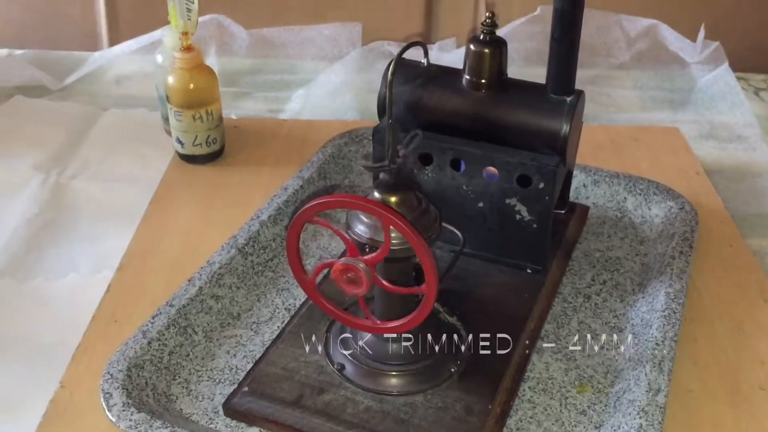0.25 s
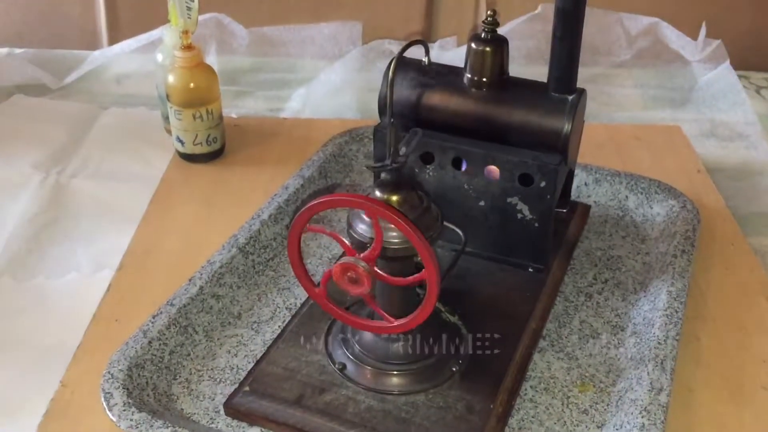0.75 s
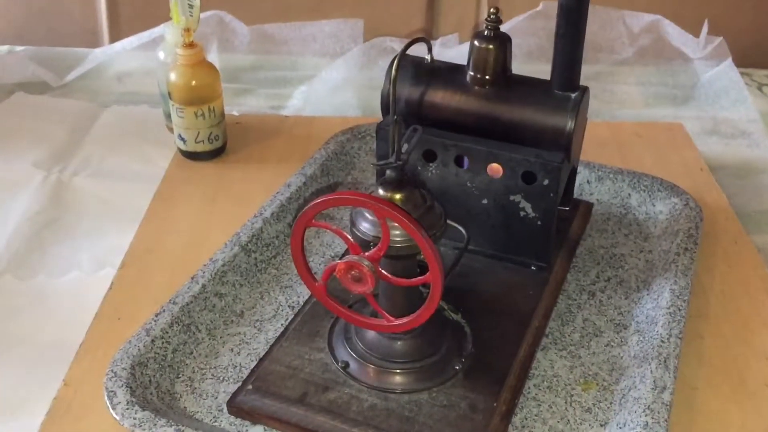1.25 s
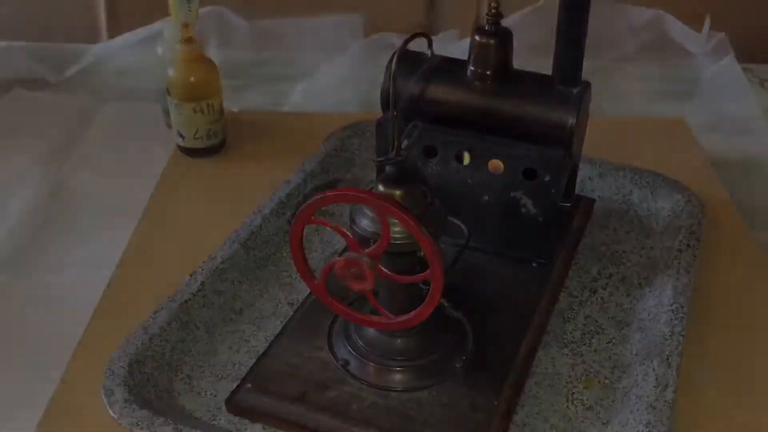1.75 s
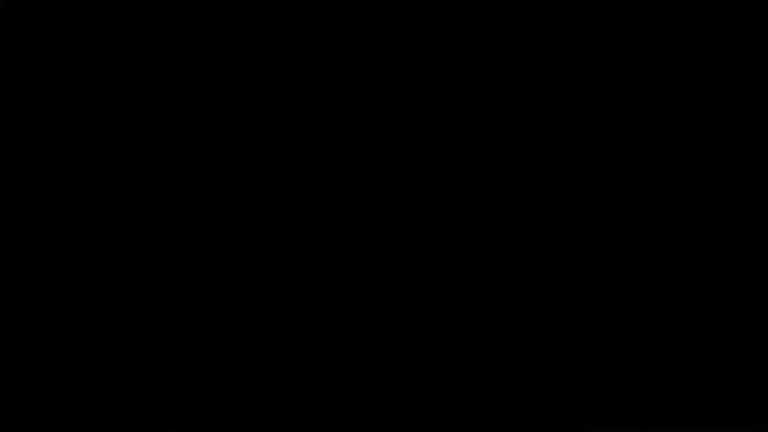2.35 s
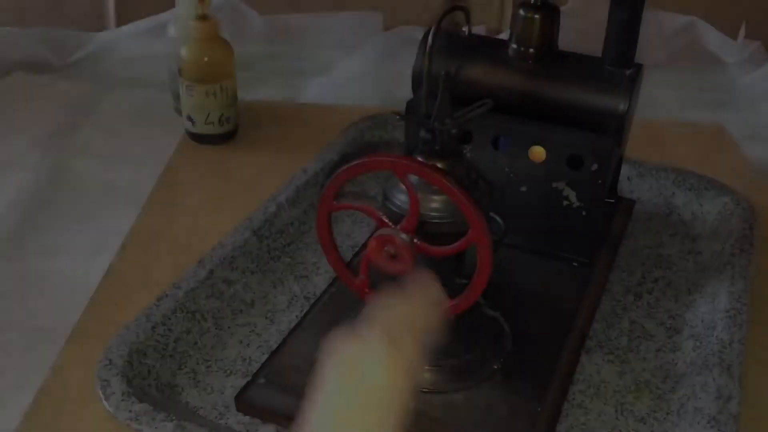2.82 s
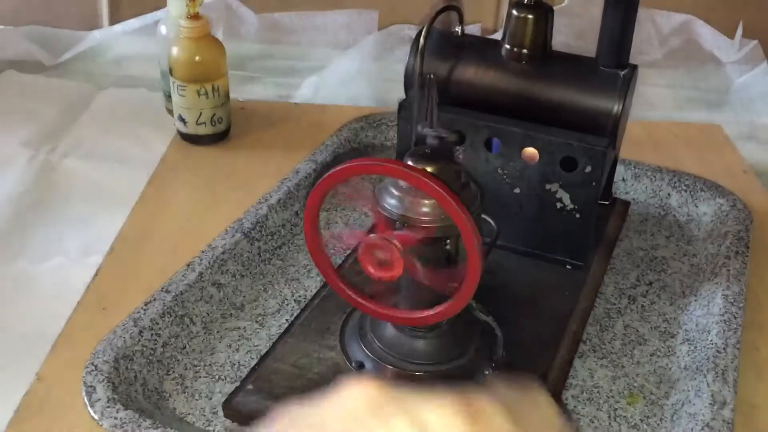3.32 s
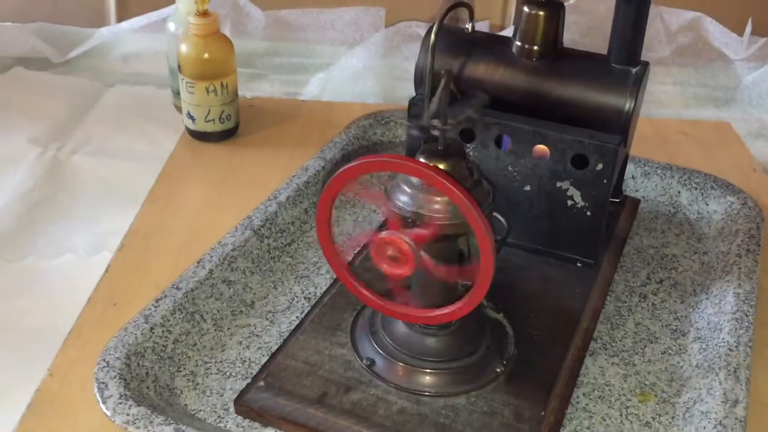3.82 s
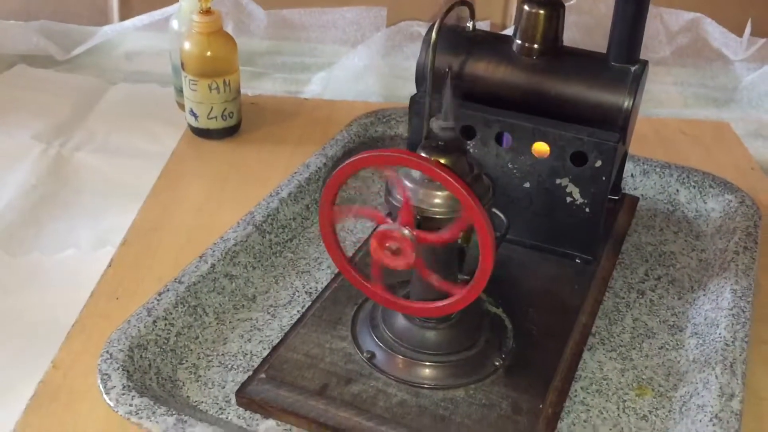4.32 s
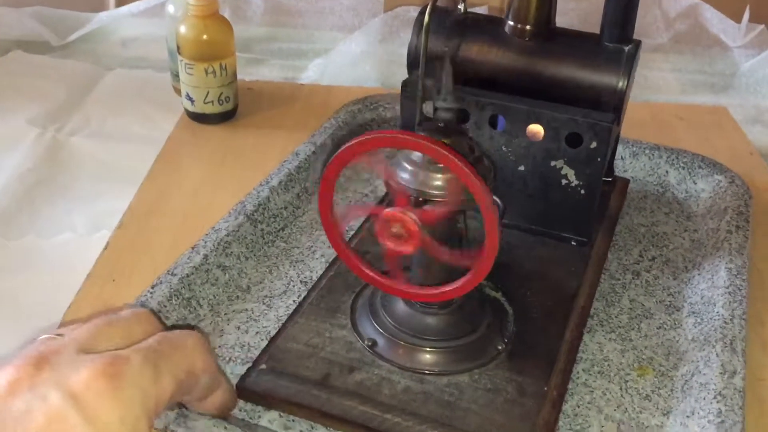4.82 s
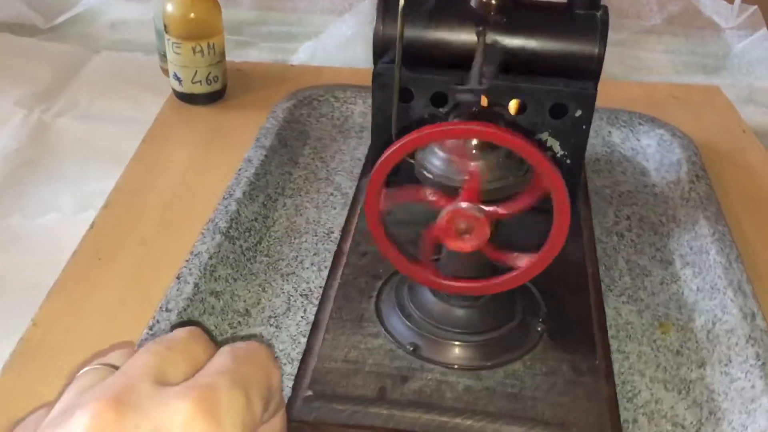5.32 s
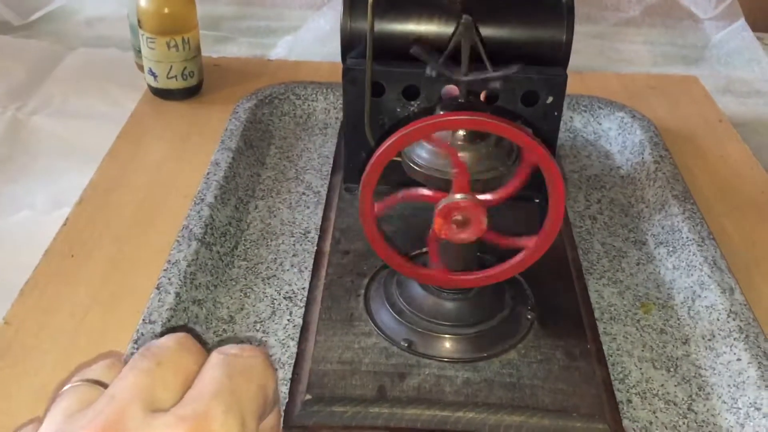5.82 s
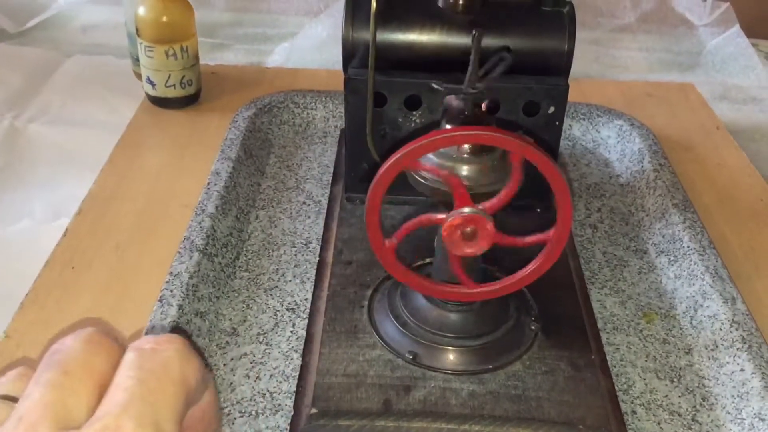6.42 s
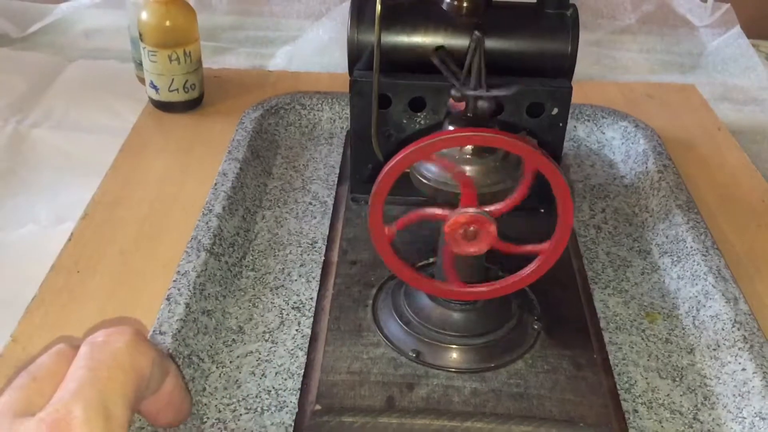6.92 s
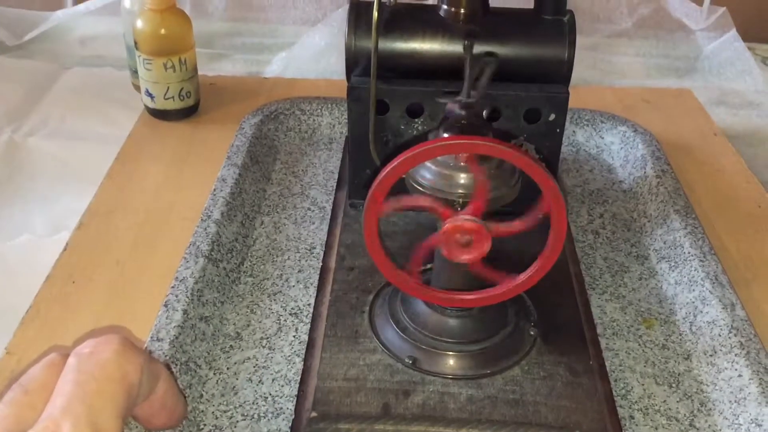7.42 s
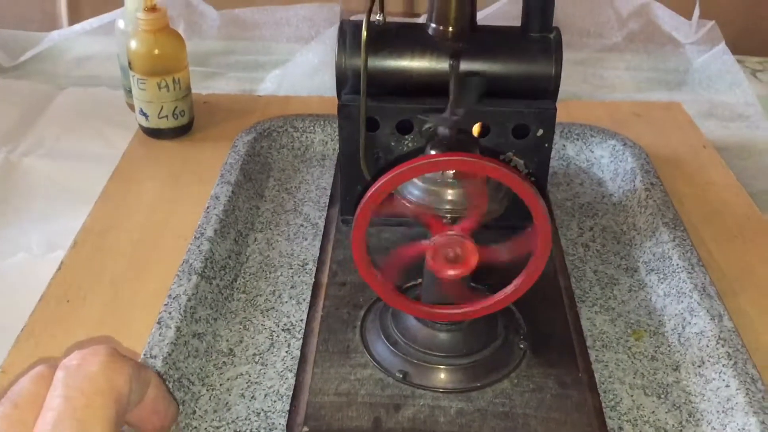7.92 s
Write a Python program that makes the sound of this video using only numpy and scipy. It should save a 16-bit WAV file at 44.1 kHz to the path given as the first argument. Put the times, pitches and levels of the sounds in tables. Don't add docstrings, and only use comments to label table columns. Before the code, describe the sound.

A toy steam engine on a tin tray, heard close in a quiet room with short dull echoes. At 0 s a soft wet exhaust puff gurgles through bright, sputtering steam hiss; a second comes at 0.5 s with a low table thump. The engine stalls: hiss in small swells, fine ticks of droplets, a dry lever click at 1.03 s, light knocks at 1.5 s and a sharper rap at 1.8 s. Around 2.4 s the sound dips for an instant, then steady hiss returns, with a tinny knock at 2.9 s. From 3.4 s gurgling chuffs restart, about three per second, with bubbling tones. At 4.2-4.8 s the dragged base shudders and thumps, with a loud metallic clank at 4.47 s. From 5 s chuffs settle near two per second, hiss spitting between them; a strong wet gush bursts at 6.5 s, and the chuffing continues to the end.

```python
import sys
import numpy as np
from scipy import signal
from scipy.io import wavfile
from scipy.ndimage import uniform_filter1d

SR = 44100
rng = np.random.default_rng(int(sys.argv[2]) if len(sys.argv) > 2 else 0)


def elevation(decibels):
    levels = np.asarray(decibels, float)
    return 10 ** (levels / 20)


def wrap_up_sound(samples):
    columns = np.atleast_2d(samples).T
    tamed = np.clip(columns, -1, 1)
    steps = np.round(tamed * 32767).astype(np.int16)
    wavfile.write(sys.argv[1], SR, steps)


N = 359415
SCENE_CHANGE_S = 2.405

# start in seconds, port open in seconds, gurgle in dB,
# port opening rate in dB/s, table shake in dB.
STROKES = [(0.0, 0.07, -39.5, 184, -66), (0.512, 0.089, -39, 905, -75), (3.42, 0.1, -37, 200, -64),
           (3.67, 0.11, -41, 400, -67), (3.96, .11, -42, 248, -63), (4.27, 0.077, -41.5, 292, -76),
           (4.48, 0.021, -40, 600, -74), (4.6, 0.11, -43, 300, -60), (4.98, 0.096, -41, 158, -69),
           (5.34, 0.056, -39.5, 145, -59), (5.74, 0.125, -41.5, 221, -60.5), (6.21, 0.082, -39, 196, -59.5),
           (6.665, 0.078, -37.5, 404, -60), (7.16, 0.06, -39, 199, -57.5), (7.593, 0.11, -40.5, 227, -58.5),
           (8.02, 0.1, -37, 300, -58.5)]


def steam():
    # centre in Hz, width in Hz, then level in dB at the first stand, second stand, turned to the front.
    metal = [(946, 470, 0.5, 2.5, -7), (1800, 510, 3.5, 1.5, -2.5), (2483, 506, -8, -3.5, -8.5),
             (3200, 667, 4.5, 2, 2.5), (3925, 230, -18, -20.5, -6.5), (4323, 620, 0.5, 1, 1.5),
             (5375, 690, -4.5, -2.5, 3), (6035, 550, 1, 1, -5.5), (6816, 920, -8, -3.5, -1),
             (8905, 1380, -0.5, 1, 4.5), (9870, 1100, -6.5, -11, -1), (11280, 780, 1, 1, 2),
             (11750, 1320, 0, -0.5, 5), (13500, 4300, 0, -1, -0.5), (15300, 1200, -2, 4, 5)]
    turn_s = (4.7, 6)
    leak_db, sputter_db = valve()
    jet_grains = grains(per_s=370.0 * elevation(1.5 * (leak_db + 46.0)), spread_db=9.5)
    jet = rng.standard_normal(N) + 0.51 * band(jet_grains, 6400, 10000, order=1)
    wet = rng.standard_normal(N) + 0.35 * grains(per_s=600.0 * elevation(5.5 * drift(17.0)), spread_db=5.5)
    surge = drift(60.0)
    leak = elevation(leak_db + 1.0 + 1.0 * surge) * band(jet, 9870, 9000, order=1)
    sputter = elevation(sputter_db + 4.0 + 2.24 * surge) * band(wet, 3600, 5260, order=1)
    source = leak + sputter + elevation(7.0) * band(spits(), 3400, 2000) + ticks()
    t = np.arange(N) / SR
    out = np.zeros(N)
    for k, (hz, width_hz, first_db, second_db, front_db) in enumerate(metal):
        stand_db = np.where(t < SCENE_CHANGE_S, first_db, np.interp(t, turn_s, [second_db, front_db]))
        wander_db = (1.67 + 2500 / hz) * drift(7.6) + 0.57 * drift(3.7)
        out += (-1) ** k * elevation(stand_db + wander_db) * band(source, hz, width_hz)
    return out


def valve():
    # time in seconds, leak in dB, sputter relative to the leak in dB.
    pressure = [(0.0, -48, -6.5), (0.8, -49, -10.5), (1.5, -49.5, -10), (2.38, -47.5, -14.5),
                (2.44, -45, -14.5), (2.85, -45, -15), (3.15, -42.5, -40), (3.5, -47.5, -6.5),
                (3.8, -44.5, -5), (4.15, -45, -15), (4.45, -46.5, -7), (4.58, -43, -4), (4.8, -44.5, -11),
                (4.95, -41.5, -2), (5.03, -47.5, -4.5), (5.6, -45.5, -4.5), (7.0, -45, -3.5),
                (8.15, -45.5, -4.5)]
    # time of the top in seconds, leak in dB, sputter in dB, build-up in seconds.
    swells = [(0.0, -50, -45, 0.19), (.27, -44, -50, .03), (.33, -41, -57, .03), (.54, -41, -43, 0.09),
              (0.945, -44.5, -48, 0.067), (1.04, -43.5, -71, 0.035), (1.102, -43, -48, 0.038),
              (1.215, -43.5, -59, 0.03), (1.882, -48.5, -49, 0.12), (2.063, -46.5, -51.5, 0.14),
              (3.38, -42, -43.5, 0.21), (3.538, -57, -41, 0.028), (3.663, -40.5, -55, 0.066),
              (3.9, -47, -48, 0.02), (4.26, -40.5, -36.5, 0.04), (4.38, -43, -46, 0.023),
              (4.49, -40, -48, 0.072), (5.3, -40, -45, 0.18), (5.52, -39.5, -61, 0.024),
              (5.689, -37.5, -66, 0.055), (5.76, -38.5, -39, 0.045), (5.95, -44.5, -72, 0.055),
              (6.17, -40.5, -41.5, 0.13), (6.583, -37.5, -36, 0.039), (6.9, -49, -69, 0.049),
              (7.03, -44, -48, .05), (7.115, -38, -42, 0.038), (7.581, -43, -41, 0.049),
              (7.545, -44, -46, 0.07), (7.99, -40, -45, 0.084)]
    climb_db, fall_share = 13.5, 0.8
    leak_db, wet_db = in_time(pressure)
    top_s, top_db, spit_db, build_s = np.transpose(swells)
    rise = climb_db / build_s
    fall = rise / fall_share
    leak = np.hypot(elevation(leak_db), humps(top_s, 0, top_db, rise, fall))
    sputter = np.hypot(elevation(leak_db + wet_db), humps(top_s, 0, spit_db, rise, fall))
    return 20 * np.log10(leak), 20 * np.log10(sputter)


def spits():
    # start in seconds, peak in dB.
    drops = [(0.1212, -28.5), (0.5317, -28), (0.5392, -30), (0.6908, -32.5), (0.9213, -41), (7.112, -27),
             (1.2146, -32), (1.2735, -30), (3.3184, -26), (4.0477, -31), (4.2393, -22.5), (4.4742, -18),
             (4.57, -20), (5.2365, -25.5), (5.2729, -23), (5.3098, -23.5), (5.5189, -22), (5.7039, -23.5),
             (5.7404, -24), (6.0287, -22), (6.1424, -26), (6.5525, -22), (6.7283, -23.5), (7.1651, -25),
             (7.4885, -21), (7.5278, -28.5), (7.9129, -31.5), (7.9803, -21), (8.0346, -23), (8.104, -28.5)]
    t60_s, rise_s = 0.009, 0.0006
    out, t = np.zeros(N), np.arange(SR // 10) / SR
    for s, db in drops:
        puff = elevation(-60 * t / t60_s) * np.minimum(t / rise_s, 1) * rng.standard_normal(len(t))
        add_at(out, s, elevation(db) * puff / np.abs(puff).max())
    return out


def ticks():
    # start in seconds, peak in dB, centre in Hz.
    droplets = [(0.1312, -32, 3370), (0.5049, -32, 4176), (0.733, -43, 3619), (0.875, -40.5, 3529),
                (0.9007, -42, 3742), (1.2598, -40, 3900), (1.5137, -40.5, 4000), (1.7361, -39, 4206),
                (1.9181, -35, 3837), (1.9502, -38, 4304), (2.0004, -37, 3853), (2.1302, -37.5, 3775),
                (2.9009, -41, 3106), (3.069, -35, 4055), (3.2127, -35, 4361), (3.409, -30, 4758),
                (3.4546, -33, 3965), (3.6266, -43, 3840), (3.65, -32, 4688), (3.7344, -35, 4050),
                (3.8966, -37, 4060), (4.0079, -36.5, 3894), (4.1541, -35.5, 4318), (4.2164, -32, 4530),
                (4.381, -39, 3599), (4.3915, -39, 4270), (4.5157, -36, 3051), (4.7954, -33, 4207),
                (4.8744, -38, 3430), (4.8914, -36, 4801), (4.9356, -35, 4895), (4.9682, -35, 4521),
                (5.0231, -43, 3379), (5.1199, -42, 3365), (5.342, -31, 3300), (5.3608, -30, 3300),
                (5.4085, -31, 3300), (5.584, -36, 4250), (5.65, -31, 3947), (5.6606, -32, 4030),
                (5.6783, -29, 4030), (5.747, -28, 4002), (5.791, -35, 3849), (5.8168, -37, 4245),
                (5.8416, -33, 3520), (5.862, -34, 3791), (6.169, -38, 4433), (6.418, -32.5, 4413),
                (6.6986, -28, 4059), (6.7074, -31, 3521), (6.8095, -34, 4609), (7.0146, -34, 3722),
                (7.1, -32, 4542), (7.1752, -38, 4709), (7.4494, -34, 4516), (7.5946, -32, 4515),
                (7.6701, -44, 3615), (7.6813, -30, 3500), (7.953, -33, 4197), (7.9724, -34, 4792)]
    t60_s, rise_s, width_share, gain_db = 0.009, 0.0008, 0.6, 2.5
    out, t = np.zeros(N), np.arange(SR // 40) / SR
    for s, db, hz in droplets:
        puff = elevation(-60 * t / t60_s) * np.minimum(t / rise_s, 1) * rng.standard_normal(len(t))
        crack = band(puff, hz, width_share * hz, order=1)
        add_at(out, s, elevation(db + gain_db) * crack / np.abs(crack).max())
    return out


def exhaust():
    # centre in Hz, width in Hz, level in dB.
    pipe_modes = [(705, 137, 1), (800, 79, -9), (617, 104, -1.5), (900, 110, -4.5), (1140, 220, -3),
                  (520, 100, -10)]
    # time in seconds, peak in dB, pitch in Hz.
    slugs = [(0.061, -33, 742), (0.151, -39, 780), (0.33, -48.5, 703), (0.516, -35, 733), (0.808, -44, 746),
             (0.592, -32, 730), (2.425, -48, 705), (3.522, -26, 693), (3.68, -31, 684), (3.79, -32.5, 722),
             (3.944, -44, 708), (4.057, -27.5, 705), (4.222, -38, 627), (4.295, -22, 720),
             (4.354, -33, 690), (4.59, -41, 714), (5.019, -28, 710), (5.354, -31.5, 790), (5.735, -38, 670),
             (5.846, -26, 719), (6.101, -46, 693), (6.209, -35, 709), (6.274, -33, 668), (6.666, -31, 685),
             (6.911, -39.5, 723), (7.587, -37, 719), (7.672, -28, 688), (8.03, -21.5, 705),
             (8.06, -46, 696), (8.095, -34, 775)]
    # time in seconds, peak in dB, pitch in Hz.
    blips = [(0.002, -33, 680), (0.0164, -33, 743), (0.0304, -38, 735), (0.0848, -35, 699),
             (0.5687, -34, 734), (0.6685, -40, 754), (0.7478, -51, 763), (2.4764, -50, 700),
             (3.4207, -41, 744), (3.4686, -40, 775), (3.504, -28, 710), (3.5345, -31, 722),
             (3.5868, -39, 730), (3.7091, -42, 721), (3.7515, -46, 723), (3.953, -35.5, 695),
             (4.1106, -43, 693), (4.2349, -43, 673), (4.2633, -35, 758), (4.3641, -33, 701),
             (4.3815, -40, 744), (4.5217, -31, 770), (4.5995, -43, 750), (4.6374, -41, 730),
             (4.6564, -41, 750), (4.6923, -41.5, 738), (4.7607, -41, 705), (4.8006, -44, 714),
             (4.9108, -48, 710), (5.0315, -32, 727), (5.0854, -42, 722), (5.283, -38, 720),
             (5.3139, -43, 734), (5.4112, -40, 777), (5.5549, -43, 704), (5.6676, -43, 758),
             (5.7664, -45, 740), (5.8347, -41, 741), (5.8582, -30, 707), (5.8691, -38, 740),
             (6.2179, -30.5, 705), (6.2987, -35, 708), (6.3825, -45, 744), (6.4733, -49, 701),
             (6.6853, -40, 724), (6.7023, -36, 693), (6.7282, -37, 763), (6.7382, -34, 735),
             (6.7781, -38, 795), (6.8, -47, 751), (6.9612, -46, 736), (7.041, -44.5, 691),
             (7.1078, -47, 730), (7.1557, -37, 756), (7.1822, -37, 783), (7.2131, -35, 730),
             (7.2994, -40, 698), (7.5982, -34, 728), (7.692, -35, 715), (8.1255, -39, 730)]
    puffs = 0.5 * grains(per_s=220.0, spread_db=1.0) + rng.standard_normal(N)
    column = np.zeros(N)
    for k, (hz, width_hz, db) in enumerate(pipe_modes):
        column += (-1) ** k * elevation(db) * band(puffs, hz, width_hz)
    column = column / uniform_filter1d(column ** 2, size=700) ** 0.4
    out = elevation(-5.5) * exhaust_flow() * rms_one(column * 0.65 + band(column, 725, 340))
    add_bubbles(out, slugs, swell_s=0.009, stop_s=0.0055, gain_db=-5.0)
    add_bubbles(out, blips, swell_s=0.0045, stop_s=0.0045, gain_db=-3)
    return out


def exhaust_flow():
    idle_db, port_shuts_db_per_s = -77, 165
    gurgle_db, gurgle_per_s = 2, 31
    breakup_below_db, breakup_per_db = -50.5, 0.0887
    flick_s, trickle_db, trickle_swing_db, trickle_per_s = 3.6, -74, 6, 16
    s, held, db, opens, _ = np.transpose(STROKES)
    flow = elevation(idle_db) + humps(s, held, db, opens, port_shuts_db_per_s)
    weak_db = np.clip(breakup_below_db - 20 * np.log10(flow), 0, 12)
    depth_db = gurgle_db * (1.5 + breakup_per_db * weak_db)
    flow *= elevation(depth_db * np.clip(drift(gurgle_per_s), -2.5, 1.6))
    running = np.arange(N) > flick_s * SR
    return flow + running * elevation(trickle_db + trickle_swing_db * drift(trickle_per_s))


def add_bubbles(out, rows, swell_s, stop_s, gain_db):
    t = np.arange(SR // 15) / SR
    swell = np.exp(-((t - .04) / np.where(t < .04, swell_s, stop_s)) ** 2)
    for s, db, hz in rows:
        add_at(out, s - .033, elevation(db + gain_db) * swell * np.sin(2 * np.pi * hz * t))


def knocks():
    # start in seconds, peak in dB, centre in Hz, width in Hz, t60 in seconds.
    knock_rows = [(.775, -45, 1700, 600, 0.31), (.921, -37, 2900, 2400, .2), (1.331, -50, 1100, 400, 0.51),
                  (1.399, -40.5, 2100, 600, 0.17), (1.517, -36, 670, 830, 0.15),
                  (1.775, -39, 740, 1400, 0.17), (1.8082, -23, 620, 400, 0.05),
                  (1.813, -29, 1150, 1000, 0.24), (1.977, -35.5, 330, 430, 0.11),
                  (2.429, -46.5, 1500, 2200, 0.16), (2.722, -37, 1790, 1800, 0.093),
                  (2.89, -38.5, 1170, 590, 0.21), (2.894, -29.5, 2660, 2300, 0.3),
                  (3.199, -41, 1850, 500, 0.12), (4.221, -31, 1530, 2200, 0.48),
                  (4.466, -20, 2400, 1500, 0.27), (4.47, -27, 1150, 1300, 0.45),
                  (4.899, -43, 1200, 1000, 1.4), (4.998, -32.5, 1800, 2400, 0.6),
                  (7.13, -33.5, 1330, 1400, 0.29), (5.289, -44, 410, 95, 0.62),
                  (4.92, -47.5, 400, 140, 1.7), (4.468, -30, 3600, 730, 0.34), (6.545, -35, 700, 890, 0.38),
                  (5.3, -38.5, 1500, 1400, 0.8), (1.974, -39, 1300, 980, 0.11),
                  (4.467, -23, 7000, 3200, .04), (1.773, -40, 2200, 1400, 0.11),
                  (.56, -43.5, 1070, 480, 0.48), (5.82, -42, 710, 300, 0.33)]
    out = np.zeros(N)
    for s, db, hz, width_hz, t60_s in knock_rows:
        add_at(out, s, rattle(db, hz, width_hz, t60_s, rise_s=0.022 * t60_s, hold=1))
    return out


def gushes():
    # start in seconds, peak in dB, centre in Hz, t60 in seconds.
    gush_rows = [(.315, -31.5, 3960, 0.22), (.6, -48, 3000, 0.53), (1.079, -32, 2500, 0.22),
                 (2.047, -31.5, 3250, 0.13), (3.315, -29, 3730, 0.18), (5.658, -23.5, 3940, 0.05),
                 (5.695, -53, 3980, 0.064), (5.736, -28, 4030, 0.095), (5.84, -33, 3300, 0.13),
                 (6.542, -18, 3600, 0.29), (6.57, -32, 3000, 0.54), (7.01, -27, 2800, 0.25),
                 (7.096, -29, 4770, 0.36), (7.667, -27, 3120, 0.081), (7.976, -26.5, 3000, 0.36),
                 (8.094, -31, 3280, 0.1), (4.665, -31, 3200, 0.16), (6.595, -40, 3000, 0.17),
                 (3.827, -39, 2800, 0.11), (6.14, -43, 4000, 0.18)]
    out = np.zeros(N)
    for s, db, hz, t60_s in gush_rows:
        add_at(out, s, rattle(db, hz, 1.62 * hz, 0.84 * t60_s, rise_s=0.0053, hold=1.3))
    return out


def rattle(db, hz, width_hz, t60_s, rise_s, hold):
    # centre in Hz, width in Hz, level in dB.
    tin_modes = [(965, 130, -14), (1600, 310, -8), (1975, 12, -8), (2260, 23, 0), (2500, 83, 2),
                 (3150, 89, -1), (3830, 40, 1)]
    t = np.arange(SR // 2) / SR
    uneven_db = 5.3 * np.clip(rng.standard_normal(len(t)), -3, 1.7)
    rough = rng.standard_normal(len(t)) * elevation(uneven_db)
    tin = np.zeros(len(t))
    for mode_hz, mode_width_hz, mode_db in tin_modes:
        tin += elevation(mode_db + rng.normal(0, 0.72)) * rms_one(band(rough, mode_hz, mode_width_hz, order=1))
    shape = (1 - np.exp(-t / rise_s)) * elevation(-60 * (t / t60_s) ** hold)
    return elevation(db - 9.0) * rms_one(band(rms_one(rough) + 0.03 * tin, hz, width_hz)) * shape


def tray_clangs():
    # mode in Hz, level in dB, t60 in seconds.
    clang_modes = [(1000, -6, 0.17), (1190, -8, .11), (1693, -12, 0.12), (2005, -8, 0.1), (2220, -4, 0.12),
                   (2490, -4, 0.12), (2660, -3, 0.095), (2778, -9.5, 0.044), (2330, 0, 0.1),
                   (3400, -11, 0.1), (4250, -13, 0.12), (5168, -21, .1)]
    # time in seconds, level in dB.
    strikes = [(2.898, -53), (2.91, -51), (4.468, -44), (4.4745, -33), (4.496, -47), (4.485, -40),
               (4.508, -42), (4.53, -57)]
    return clang(clang_modes, strikes)


def base_raps():
    # mode in Hz, level in dB, t60 in seconds.
    plate_modes = [(606, -1.5, 0.082), (1117, -5, 0.077), (1308, -14, .1), (1560, -1, 0.05),
                   (2003, -13, .1)]
    # time in seconds, level in dB.
    raps = [(1.518, -50), (1.774, -50), (1.8085, -42), (1.8165, -39), (1.822, -37), (1.974, -50)]
    return clang(plate_modes, raps)


def lever_snap():
    # mode in Hz, level in dB, t60 in seconds.
    lever_modes = [(900, -12, 0.005), (1637, -1, 0.006), (3359, -4, 0.006), (4600, -5, .005),
                   (6000, -6, 0.005)]
    # time in seconds, level in dB.
    clicks = [(1.0316, -30), (1.033, -36)]
    return clang(lever_modes, clicks)


def clang(modes, hits):
    out, t = np.zeros(N), np.arange(SR // 3) / SR
    hz, mode_db, t60_s = np.transpose(modes)[:, :, None]
    for s, db in hits:
        level_db = db + mode_db + 3.0 * rng.standard_normal(hz.shape)
        add_at(out, s, np.sum(elevation(level_db - 60 * t / t60_s) * np.sin(2 * np.pi * hz * t), axis=0))
    return out


def table():
    # centre in Hz, width in Hz, level in dB.
    wood_modes = [(143, 33, 3.5), (208, 65, 1.5), (281, 46, -4.5), (333, 33, -10.5), (510, 430, 0)]
    # start in seconds, peak in dB, mode in Hz, rise in seconds, t60 in seconds.
    thumps = [(.5, -33, 143, 0.037, 0.28), (0.551, -22, 143, 0.023, 0.2), (.5, -47.5, 278, 0.0071, 0.23),
              (1.521, -47.5, 150, 0.01, 0.21), (1.832, -59, 136, .01, 0.17),
              (1.975, -42, 170, 0.0031, 0.074), (2.003, -46, 143, 0.0057, 0.12),
              (2.451, -65, 143, 0.0094, 0.18), (3.245, -51, 164, 0.01, 0.25),
              (4.226, -29.5, 333, 0.037, 0.3), (4.254, -35, 160.6, 0.012, .3),
              (4.319, -32, 155, 0.011, 0.17), (4.47, -32.5, 87.2, 0.025, 0.53),
              (4.515, -35.5, 155, 0.0081, 0.27), (4.784, -25, 100, 0.004, 0.044)]
    deep_gain, wood_gain = shaking()
    shake = rng.standard_normal(N) + 0.77 * grains(per_s=60.0, spread_db=3.0)
    deep = rms_one(band(rng.standard_normal(N), 48.7, 43.0))
    wood = sum(elevation(db) * rms_one(band(shake, hz, width_hz, order=1)) for hz, width_hz, db in wood_modes)
    out = deep_gain * deep + wood_gain * rms_one(band(wood, 253, 770))
    t = np.arange(SR // 2) / SR
    for s, db, hz, rise_s, t60_s in thumps:
        shape = elevation(db - 60 * t / t60_s) * (1 - np.exp(-t / rise_s))
        add_at(out, s, shape * np.sin(2 * np.pi * hz * t))
    return out


def shaking():
    # start in seconds, held in seconds, deep shudder in dB, wood rattle in dB.
    shoves = [(.52, 0.18, -65, -62.5), (1.52, 0.016, -81, -64), (1.82, 0.017, -75, -60.5),
              (1.99, 0.012, -72, -56), (2.45, 0.026, -64, -64.5), (3.28, 0.022, -55.5, -67),
              (4.23, 0.062, -45, -43.5), (4.474, 0.072, -44, -39), (4.62, 0.042, -54, -53),
              (4.8, 0.0084, -56, -68), (5.01, 0.025, -63, -59), (5.33, 0.019, -96, -71),
              (6.38, .01, -84, -70), (6.56, 0.016, -80, -62)]
    deep_idle_db, wood_idle_db, stroke_wood_db = -74.5, -71.5, -7
    shove_rise_db_per_s, shove_fall_db_per_s = 900, 198
    s, *_, db = np.transpose(STROKES)
    running = humps(s, 0, db, rise_db_per_s=167, fall_db_per_s=56)
    s, held, deep_db, wood_db = np.transpose(shoves)
    deep = humps(s, held, deep_db, shove_rise_db_per_s, shove_fall_db_per_s)
    wood = humps(s, held, wood_db, shove_rise_db_per_s, shove_fall_db_per_s)
    return elevation(deep_idle_db) + running + deep, elevation(wood_idle_db) + elevation(stroke_wood_db) * running + wood


def room(x):
    t60_s, echo_db, dull_hz = 0.13, -6.5, 3000
    t = np.arange(SR // 4) / SR
    echoes = rng.standard_normal(len(t)) * elevation(-60 * t / t60_s) * (t > .002)
    dull = signal.lfilter(*signal.butter(1, dull_hz, fs=SR), x)
    return x + elevation(echo_db) * signal.fftconvolve(dull, echoes / np.linalg.norm(echoes))[:N]


def room_air():
    return elevation(-74.5) * rms_one(band(rng.standard_normal(N), 970, 2300))


def add_at(out, start_s, sound):
    at = round(start_s * SR)
    first = max(at, 0)
    out[first:at + len(sound)] += sound[first - at:N - at]


def in_time(rows):
    s, *columns = np.transpose(rows)
    return [np.interp(np.arange(N) / SR, s, c) for c in columns]


def humps(start, held, db, rise_db_per_s, fall_db_per_s):
    t = np.arange(0, N, 16) / SR
    power = np.zeros(len(t))
    for s, hold, top_db, rise, fall in np.broadcast(start, held, db, rise_db_per_s, fall_db_per_s):
        drop_db = rise * np.maximum(s - t, 0) + fall * np.maximum(t - s - hold, 0)
        power += elevation(2 * (top_db - drop_db))
    return np.interp(np.arange(N) / SR, t, np.sqrt(power))


def rms_one(x):
    return x / np.sqrt(np.mean(x ** 2) + 1e-20)


def drift(rate_hz):
    r = np.exp(-20 * np.pi * rate_hz / SR)
    slow = signal.lfilter([1], [1, -2 * r, r * r], rng.standard_normal(N // 10 + 4002))[4000:]
    return np.interp(np.arange(N) / 10, np.arange(len(slow)), rms_one(slow))


def band(x, hz, width_hz, order=2):
    low = np.sqrt(hz ** 2 + width_hz ** 2 / 4) - width_hz / 2
    high = min(low + width_hz, .45 * SR)
    return signal.sosfilt(signal.butter(order, [low, high], "band", fs=SR, output="sos"), x)


def grains(per_s, spread_db):
    sizes = elevation(spread_db * np.minimum(rng.exponential(1, N), 3)) * rng.choice([-1, 1], N)
    return rms_one(sizes * (rng.random(N) < per_s / SR)) + 1e-18


def scene():
    pipe_room_share = 0.33
    pipe = exhaust()
    struck = knocks() + gushes() + tray_clangs() + base_raps()
    echoing = room(steam() + pipe_room_share * pipe + struck)
    direct = (1 - pipe_room_share) * pipe + table() + lever_snap() + room_air()
    return (echoing + direct)[None]


def top_cut(x):
    return signal.sosfilt(signal.butter(12, 15760, fs=SR, output="sos"), x)


def record(dry):
    dip_db, fade_s = -33, 0.033
    thin = signal.sosfilt(signal.butter(4, 52.0, "high", fs=SR, output="sos"), dry)
    away = np.abs(np.arange(N) / SR - SCENE_CHANGE_S) / fade_s
    return top_cut(thin * elevation(dip_db * np.clip(1 - away, 0, 1) ** 2))


dry = scene()
out = record(dry)
wrap_up_sound(out)
```